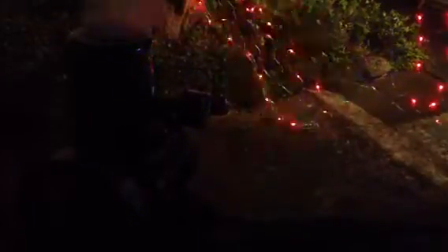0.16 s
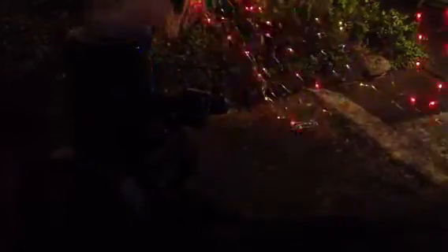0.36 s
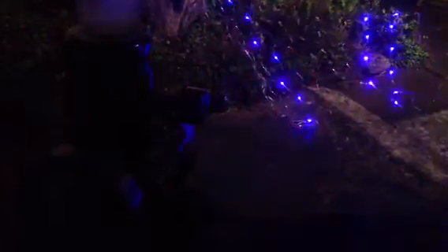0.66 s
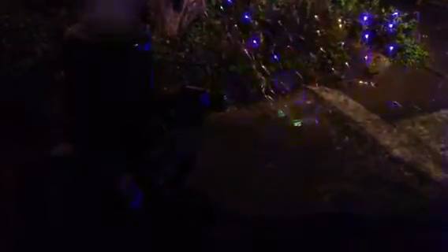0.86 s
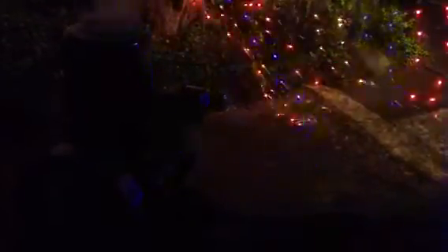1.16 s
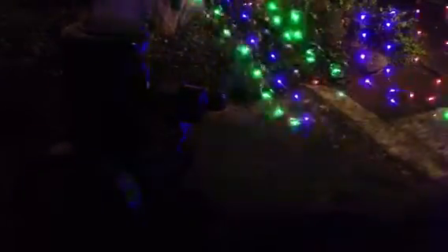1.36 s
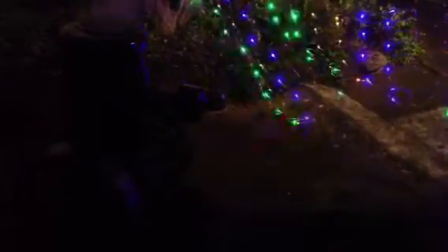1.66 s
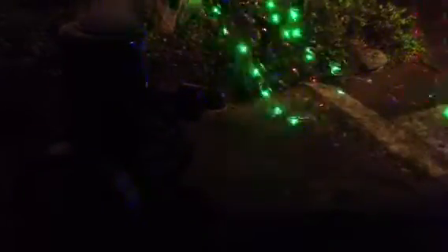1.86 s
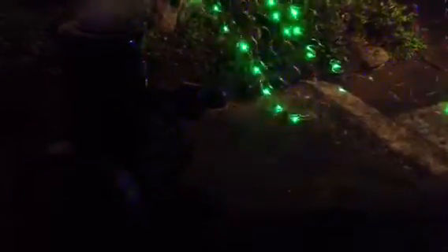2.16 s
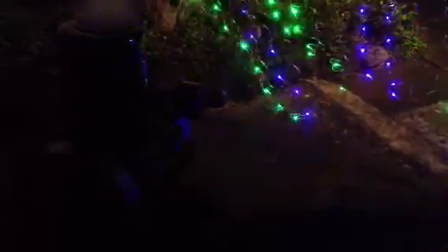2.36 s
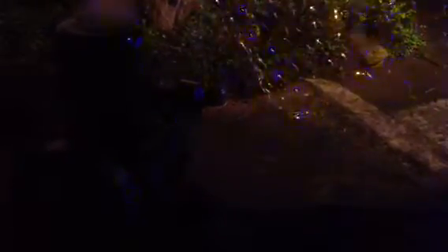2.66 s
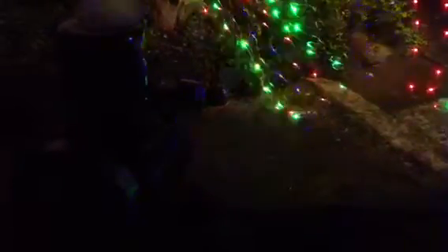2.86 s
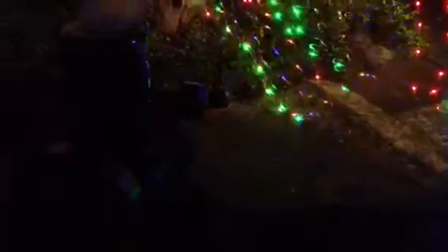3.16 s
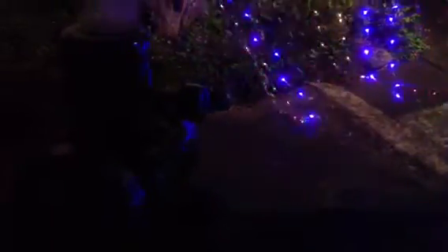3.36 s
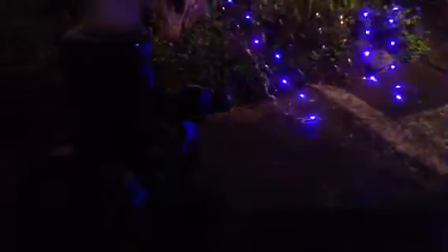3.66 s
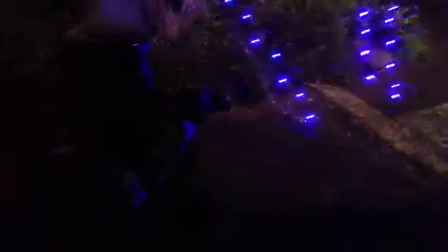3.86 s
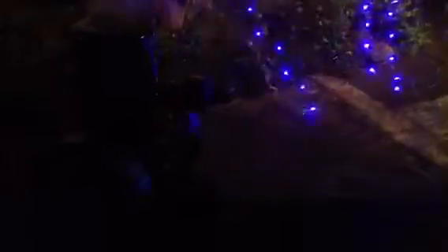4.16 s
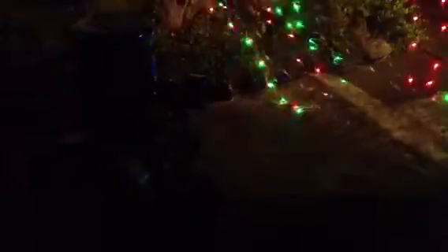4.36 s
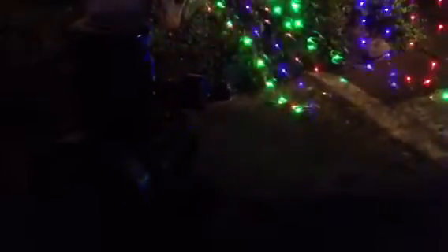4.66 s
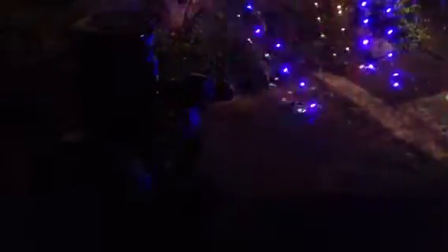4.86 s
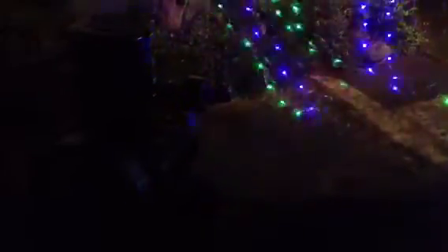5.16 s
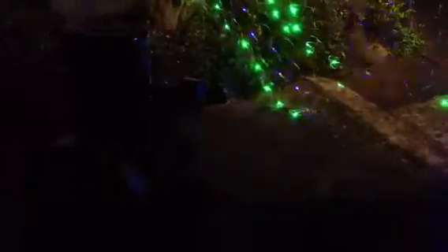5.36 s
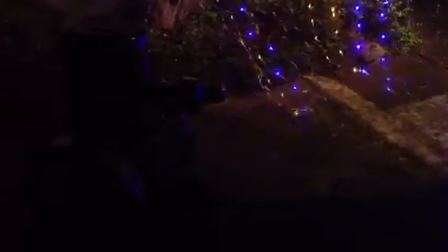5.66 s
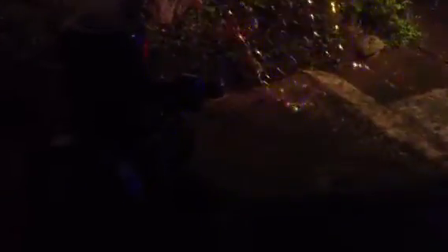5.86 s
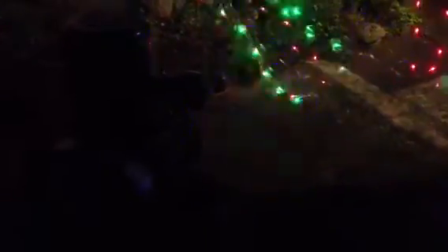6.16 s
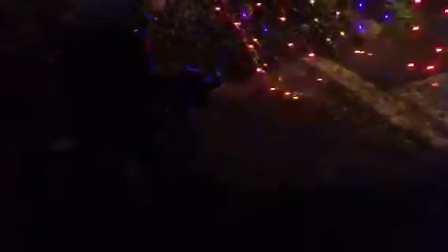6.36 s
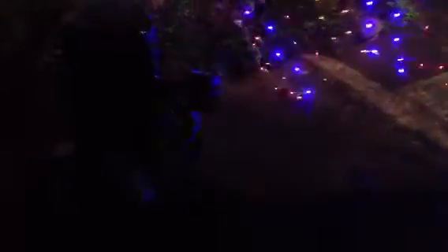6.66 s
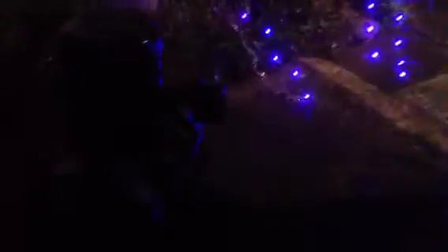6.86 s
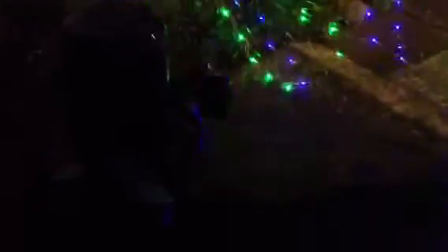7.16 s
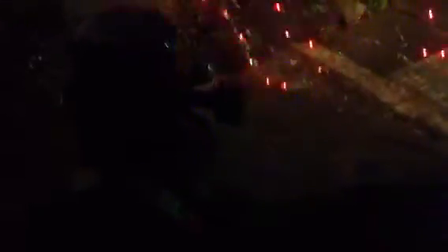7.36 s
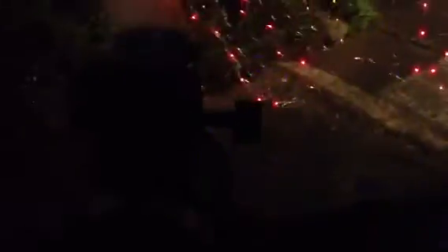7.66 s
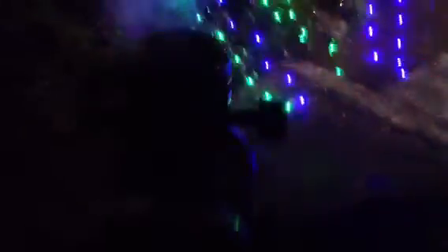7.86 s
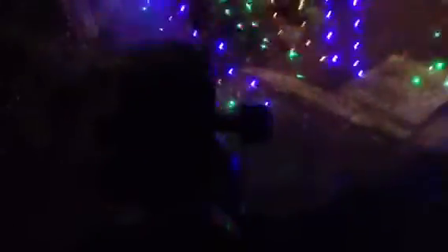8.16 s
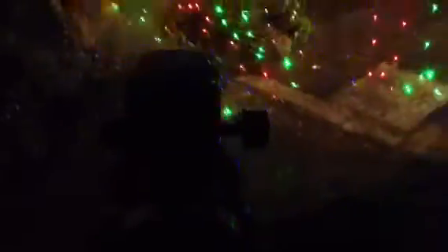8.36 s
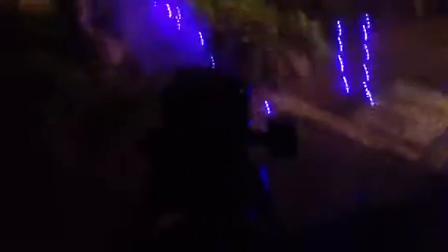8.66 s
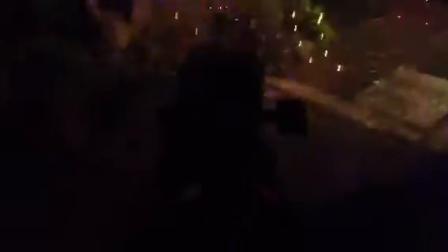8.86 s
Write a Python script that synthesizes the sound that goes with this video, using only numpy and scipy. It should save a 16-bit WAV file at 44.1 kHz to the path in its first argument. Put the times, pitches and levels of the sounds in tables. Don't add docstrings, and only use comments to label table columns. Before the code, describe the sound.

A slow single-cylinder engine puffs steadily outdoors, about four sharp exhaust barks a second over gear rattle and knocking rods, growing closer near the end.

```python
import sys
import numpy as np
from scipy import signal
from scipy.fft import rfft, irfft, next_fast_len
from scipy.io import wavfile

SR = 44100
rng = np.random.default_rng(int(sys.argv[2]) if len(sys.argv) > 2 else 0)


def elevation(decibels):
    levels = np.asarray(decibels, float)
    return 10 ** (levels / 20)


def generate_wav(signal):
    frames = np.transpose(np.atleast_2d(signal))
    scaled = np.clip(frames, -1, 1) * 32767
    pcm = np.round(scaled).astype(np.int16)
    wavfile.write(sys.argv[1], SR, pcm)


N = 397782
TIME_S = np.arange(N) / SR
TAIL_S = np.arange(SR // 4) / SR

# time_s, nearness (0 afar, 1 close)
NEARNESS = [
    (0, 0),
    (6.2, .05),
    (7, .7),
    (8.2, .9),
    (9.02, 1),
]
# time_s, firings_per_s
SPEED = [(0, 3.847), (.6, 3.889), (1.8, 3.919), (2.6, 3.969), (4.4, 3.967), (6.2, 4.028), (7.8, 4.043),
         (9.1, 3.991)]


def evened(x):
    return x / np.sqrt(np.mean(x ** 2) + 1e-20)


def follow(rows, t_s):
    return np.interp(t_s, *np.transpose(rows))


def read(points, hz):
    f, value = np.transpose(points)
    return np.interp(np.log(hz + 1), np.log(f + 1), value)


def noise(colour):
    size = next_fast_len(N)
    hz = np.fft.rfftfreq(size, 1 / SR)
    spectrum = rfft(rng.standard_normal(size)) * elevation(read(colour, hz))
    return evened(irfft(spectrum, size)[:N])


def flutter(hz, depth_db):
    slow = signal.lfilter(*signal.butter(2, hz, fs=SR), rng.standard_normal(N))
    return evened(elevation(depth_db * evened(slow)))


def resonate(x, hz, width_hz):
    turn = np.exp(2j * np.pi * np.cumsum(hz * np.ones(len(x))) / SR)
    r = np.exp(-np.pi * width_hz / SR)
    smooth = signal.lfilter([1 - r], [1, -r], x / turn)
    return 2 * (turn * smooth).real


def whistle(hz, width_hz):
    once = resonate(rng.standard_normal(N), hz, width_hz)
    return evened(resonate(once, hz, 2 * width_hz))


def ring(hz, db, t60_s):
    return elevation(db - 60 * TAIL_S / t60_s) * np.sin(2 * np.pi * hz * TAIL_S)


def per_firing(sound, db, at_s):
    train = np.zeros(N + 2 * SR)
    train[np.round(at_s * SR).astype(int) + SR] = elevation(db)
    return signal.oaconvolve(train, sound)[SR:SR + N]


def stroke(shape, db, s):
    once = elevation(np.interp(TAIL_S, *np.transpose(shape), left=-99, right=-99))
    return per_firing(once, db, s)


def firings():
    t = -.0165 + np.arange(N + SR // 4) / SR
    cycles = np.cumsum(follow(SPEED, t)) / SR
    s = np.interp(np.arange(int(cycles[-1]) + 1), cycles, t)
    skip_at_s, skip_s = 3.2, .0232
    return s - (s > skip_at_s) * skip_s


def on_firings(s, rows, usual):
    out, rows = np.array(usual, float), np.array(rows)
    nearest = abs(s[:, None] - rows[:, 0]).argmin(axis=0)
    out[nearest] = rows[:, 1:]
    return out.T


def strength(s, far_db, near_db, share, scatter_db):
    # time_s, charge_db
    uneven = [(2.29, 1.5), (2.54, -0.5), (2.8, 2.5), (3.05, -1.5), (3.78, 1), (4.28, -2), (4.54, 2),
              (4.79, 2.5), (5.54, -3), (7.03, 1), (7.52, -1), (1.78, -0.5), (2.04, -1), (8.02, 0)]
    charge_db = on_firings(s, uneven, np.zeros((len(s), 1)))[0]
    chance_db = scatter_db * rng.standard_normal(len(s))
    return far_db + near_db * follow(NEARNESS, s) + share * charge_db + chance_db


def puffs(s, level_db):
    # delay_s, level_db
    echoes = [(.0054, -24), (0.0195, -15), (0.0227, -42)]
    near, close = follow(NEARNESS, TIME_S), follow(NEARNESS, s)
    lead_s = 40 / SR
    t = np.arange(120) / SR - lead_s
    flow = np.exp(-((t - .0001) / np.where(t < .0001, .00034, .00024)) ** 2)
    slope = np.gradient(flow)
    push = slope / slope.max() + .5 * flow
    out = per_firing(push, level_db + 4, s - lead_s)
    ground_s, ground_db = .0023 + .0004 * close, -.5
    out += (1 - .5 * near) * per_firing(push, level_db + 4 + ground_db, s + ground_s - lead_s)
    dull = np.convolve(push, evened(np.hanning(70)) / 20)
    for delay_s, db in echoes:
        shift_s = -.0014 * close * (delay_s > .01)
        out += elevation(5.1 * near) * per_firing(dull, level_db + db, s + delay_s + shift_s - lead_s)
    return out


def puff_rings(s, level_db):
    # pitch_hz, level_db, t60_s
    box = [(94, -34.5, 0.17), (140.5, -39.5, 0.18), (179, -42, 0.091), (254.8, -33, 0.076)]
    near, close = follow(NEARNESS, TIME_S), follow(NEARNESS, s)
    mouth = np.minimum(np.arange(SR // 4) / 40, 1) * ring(4250, db=10, t60_s=.014)
    out = (1 - .6 * near) * per_firing(mouth, level_db, s + .0011)
    for hz, db, t60_s in box:
        out += per_firing(ring(hz, db + 21, t60_s), level_db, s + .0013)
    corner = (1 - np.exp(-(TAIL_S / .022) ** 2)) * ring(186, db=-5, t60_s=.125)
    out += near * per_firing(corner, level_db, s + .016)
    thud_at_s = s + .6 / follow(SPEED, s)
    out += per_firing(ring(380, db=-24, t60_s=.03), level_db, thud_at_s)
    wall_hz, wall_db, wall_t60_s = 350, -9.5, .04
    wall = ring(wall_hz, wall_db, wall_t60_s) + ring(1.33 * wall_hz, wall_db - 3, wall_t60_s)
    wall *= 1 - np.exp(-(TAIL_S / .005) ** 2)
    return out + elevation(1.5 * near) * per_firing(wall, level_db, s + .073 - .002 * close - .003)


def exhaust(s, puff_db):
    # delay_s, level_db
    blast_shape = [(0, -19), (.002, -17.5), (.005, -4), (.009, 2.5), (.012, 2.5), (.015, -1.5), (.018, -12),
                   (.021, -20), (.03, -27)]
    roar_shape = [(0, -32), (.002, 6.5), (.01, 4.5), (.02, -8.5), (.03, -40), (.06, -24), (.1, -15.5),
                  (.15, -52)]
    wheeze_shape = [(0, -73), (.01, 6), (.025, 1), (.035, -4.5), (.045, -1.5), (.055, -9), (.07, -11),
                    (.1, -18), (.15, -38)]
    # freq_hz, density_db
    blast_colour = [(800, -52), (1600, -18), (2900, -11.5), (4700, 0), (5900, -5), (9000, -5), (11000, -10),
                    (15000, -10.5)]
    roar_colour = [(60, -26), (200, -14.5), (400, 3), (900, 2.5), (1400, 1.5), (2500, 0), (5000, -77)]
    wheeze_colour = [(40, -21), (200, -8.5), (600, -8.5), (1500, -11), (2500, -7.5), (6000, -0.5),
                     (9000, -8.5), (15000, -12)]
    # time_s, whistle_db
    aim = [(.2, -3), (.5, 3.5), (1, 5.5), (1.5, -8), (2.3, 1.5), (3.05, 5), (3.3, -0.5), (3.8, 0), (4.1, 2),
           (5.3, 6.5), (6, 8), (7, 4.5), (7.5, -8), (8.3, 1.5), (8.8, -17)]
    # time_s, pitch_hz, gain_db
    singers = [(.5, 2040, 9), (1.27, 2110, 4), (1.53, 2130, 5), (2.8, 2130, 3), (3.78, 2134, 7.5),
               (4.03, 2296, 10), (4.28, 2150, 3), (5.04, 2270, 2), (5.54, 2250, 3), (6.04, 2120, 7),
               (6.53, 2060, 8), (6.78, 1930, 10), (7.03, 1920, 2), (7.52, 2100, 4), (8.52, 2350, 3)]
    chance = rng.standard_normal((len(s), 5))
    usual = chance[:, :2] * [170, 1.] + [2050, 0]
    low_hz, low_db = on_firings(s, singers, usual)
    aim_db = follow(aim, s) - .5 * chance[:, 2]
    shrill_hz, shrill_db = 8800 + 900 * chance[:, 4], -14 + 3 * chance[:, 3]
    firing = np.clip(np.searchsorted(s - .022, TIME_S) - 1, 0, None)

    low = elevation(1.2 * low_db - 20)[firing] * whistle(low_hz[firing], 150)
    high_hz = 4676 + 200 * np.log(flutter(hz=10.3, depth_db=5.5))
    high = elevation(1.9 * aim_db - 16)[firing] * whistle(high_hz, 230)
    shrill = elevation(shrill_db)[firing] * whistle(shrill_hz[firing], 350)
    jet_db = strength(s, far_db=-12, near_db=-1.5, share=.53, scatter_db=1.14) - .056 * aim_db
    jet = (noise(blast_colour) + low + high + shrill) * flutter(hz=466, depth_db=1.0)
    blast = stroke(blast_shape, jet_db, s) * jet

    roar = stroke(roar_shape, puff_db, s) * noise(roar_colour)

    sing_gain = elevation(.4 * aim_db - 5)[firing] * elevation(1.5 * follow(NEARNESS, TIME_S))
    sing = sing_gain * whistle(4680, 330) * flutter(hz=50, depth_db=2.2)
    wheeze_db = strength(s, far_db=-28, near_db=7.5, share=.93, scatter_db=1.93)
    wheeze = stroke(wheeze_shape, wheeze_db, s) * (noise(wheeze_colour) + sing)
    return elevation(3) * blast + elevation(-12.5) * roar + elevation(2.5) * wheeze


def gears(s):
    # freq_hz, density_db
    colour = [(30, -11), (60, -5), (100, -3.5), (180, -3), (620, -7), (900, -0.5), (1350, -6), (2400, -4),
              (3200, -7.5), (5600, -8.5), (15000, -17.5)]
    # pitch_hz, width_hz, level_db
    singing = [(190, 18, -19), (405, 25, -15), (4650, 450, -17)]
    near = follow(NEARNESS, TIME_S)
    rattle = noise(colour) + .5 * whistle(1370 - 110 * near, 150)
    for hz, width_hz, db in singing:
        rattle += elevation(db) * whistle(hz, width_hz)
    rattle *= flutter(hz=45.3, depth_db=1.0)
    train_db = strength(s, far_db=-46, near_db=5.5, share=.9, scatter_db=2.74)
    level_db = np.interp(TIME_S, s + .2, train_db)
    hum = elevation(-39) * near * whistle(49, 14)
    return elevation(level_db) * rattle + hum


def rods(s):
    # delay_s, level_db
    shape = [(.055, -40), (.064, -8), (.069, 3), (.092, 2), (.11, -6), (.124, -12), (.132, -5), (.14, -1),
             (.17, -32)]
    # freq_hz, density_db
    colour = [(100, 3), (350, 4.5), (600, -9.5), (1000, 8.5), (1350, 2.5), (2300, 7.5), (3600, 10),
              (7000, 3), (14000, -45)]
    # cycle_share, level_db
    knocks = [(.278, 1), (.335, 0), (.52, -7)]
    # pitch_hz, level_db, near_gain_db, t60_s
    casing = [(1260, 2, 2.5, 0.056), (1374, 5.5, -8, 0.06), (1855, -5, 1, 0.04), (2200, -8.5, 1, 0.048),
              (1014, -10, 4, 0.033)]
    cycle_s, close = 1 / follow(SPEED, s), follow(NEARNESS, s)
    clack_db = strength(s, far_db=-34, near_db=8, share=.6, scatter_db=1.2)
    clack = stroke(shape, clack_db, s) * noise(colour) * flutter(hz=120, depth_db=2.)
    onset = np.minimum(np.arange(SR // 4) / 60, 1)
    for share, knock_db in knocks:
        play_s = .001444 * rng.standard_normal(len(s))
        for hz, db, near_db, t60_s in casing:
            chance_db = 3.2 * rng.standard_normal(len(s))
            blow_db = clack_db + knock_db + db + near_db * close + chance_db
            at_s = s + share * cycle_s + play_s + .00098 * rng.random(len(s))
            clack += per_firing(onset * ring(hz, 0, t60_s), blow_db, at_s)
    return elevation(-4.5) * clack


def inlet(s):
    # delay_s, level_db
    shape = [(.06, -34), (.085, 7), (.105, -2), (.125, 5.5), (.145, 2.5), (.16, 0), (.175, -9), (.2, -27)]
    # freq_hz, density_db
    colour = [(300, -27), (1000, -7.5), (3000, -5.5), (4700, 6), (6000, 6), (7500, 2), (9500, -15),
              (11500, -2), (15000, -10)]
    near, close = follow(NEARNESS, TIME_S), follow(NEARNESS, s)
    intake_db = strength(s, far_db=-50, near_db=5, share=.6, scatter_db=1)
    bright = .43 * near ** 2 * noise([(4000, -28), (7000, -4), (15000, 1.5)])
    air = (noise(colour) + bright) * flutter(hz=60, depth_db=2.2)
    intake = stroke(shape, intake_db, s) * air
    decay = elevation(-60 * np.arange(2000) / SR / .018)
    seat_db = intake_db + 21 + 3 * close + 2.5 * rng.standard_normal(len(s))
    seat_s = s + .3 / follow(SPEED, s)
    metal = noise([(2500, -20), (4600, 8), (6000, -1), (8000, 0), (15000, -3)])
    return elevation(9) * intake + per_firing(decay, seat_db, seat_s) * metal


def stray_sounds():
    tick_at_s, tick_s = 3.521, .0015
    tick = elevation(-27) * (TIME_S > tick_at_s) * np.exp(-abs(TIME_S - tick_at_s) / tick_s)
    hiss = elevation(-45) * np.interp(TIME_S, [7.7, 8.2], [0, 1])
    brush_at_s, brush_s = 8.672, .055
    swish = np.interp(TIME_S - brush_at_s, [0, .004, brush_s, 1.5 * brush_s], [0, 1, .7, 0])
    brush = elevation(-31.5) * swish * flutter(hz=100, depth_db=1.2)
    return (tick + hiss + brush) * noise([(2000, -20), (6000, 0), (15000, 0)])


def scene():
    s = firings()
    puff_db = strength(s, far_db=-17, near_db=3, share=0., scatter_db=.83)
    gas = puffs(s, puff_db) + puff_rings(s, puff_db) + exhaust(s, puff_db)
    machine = gears(s) + rods(s) + inlet(s)
    return (gas + machine + stray_sounds())[None]


def top_cut(x):
    return signal.sosfilt(signal.butter(12, 15690, fs=SR, output="sos"), x)


def record(dry):
    # freq_hz, gain_db
    microphone = [(30, -45), (60, -39), (100, -8.5), (180, 1), (400, 0.5), (600, 0), (1350, 1), (1700, 3),
                  (2150, 1.5), (2900, -6), (4200, -4.5), (4700, -4), (5600, -10), (9000, -3)]
    log_gain = np.log(elevation(read(microphone, abs(np.fft.fftfreq(8192, 1 / SR)))))
    minimum_phase = -signal.hilbert(log_gain).imag
    taps = np.fft.ifft(np.exp(log_gain + 1j * minimum_phase)).real[:4096]
    heard = signal.oaconvolve(dry, taps[None])[:, :N]
    heard = np.tanh(heard / .62) * .62
    band = signal.firwin(801, 15250, window=("kaiser", 8), fs=SR)
    heard = signal.oaconvolve(heard, band[None], "same")
    return top_cut(heard)


dry = scene()
out = record(dry)
generate_wav(out)
```